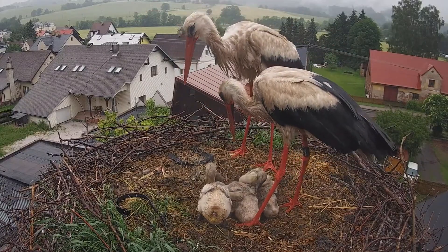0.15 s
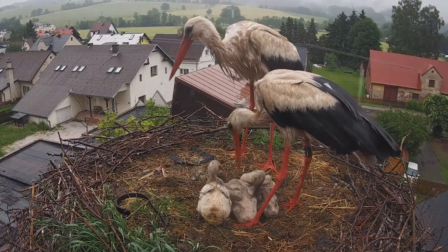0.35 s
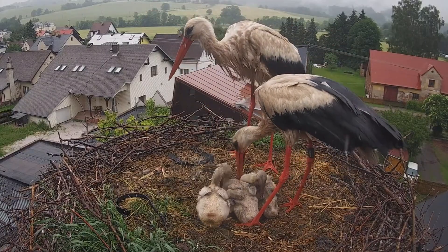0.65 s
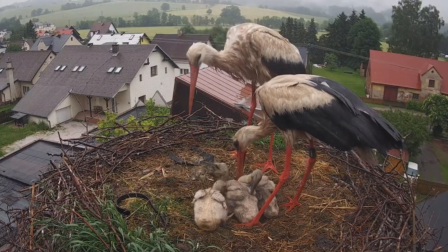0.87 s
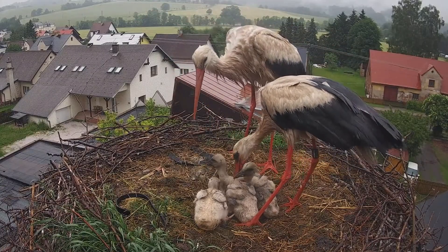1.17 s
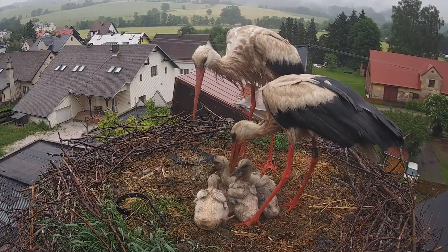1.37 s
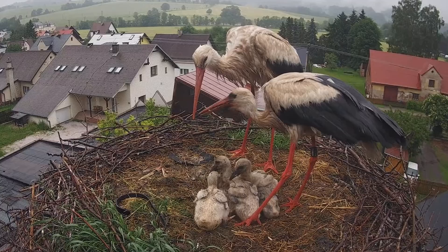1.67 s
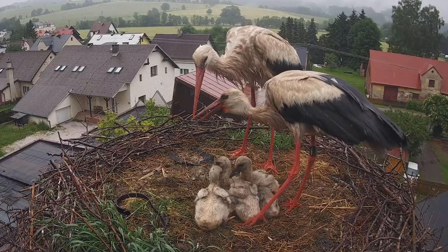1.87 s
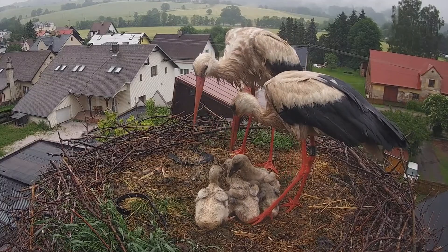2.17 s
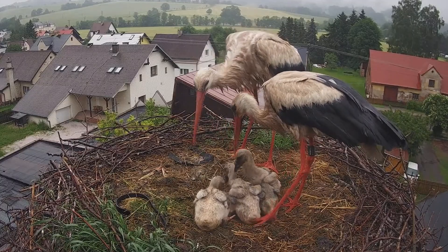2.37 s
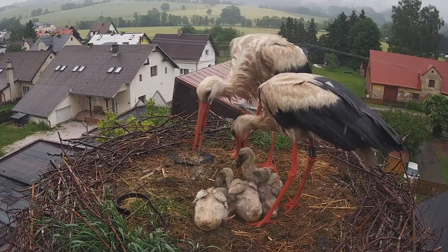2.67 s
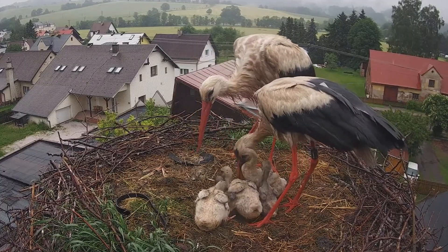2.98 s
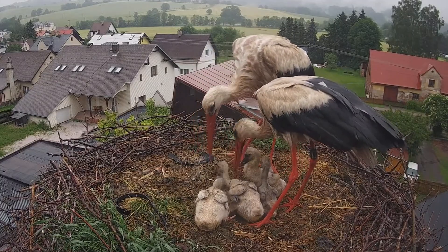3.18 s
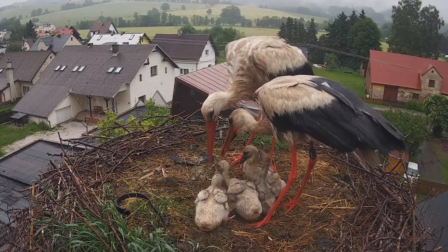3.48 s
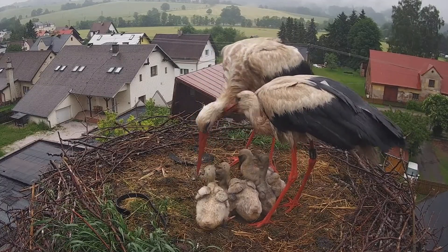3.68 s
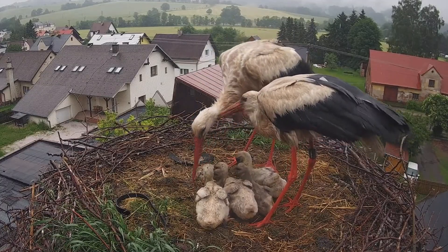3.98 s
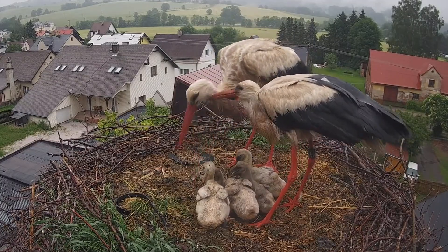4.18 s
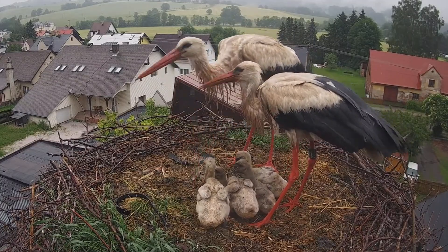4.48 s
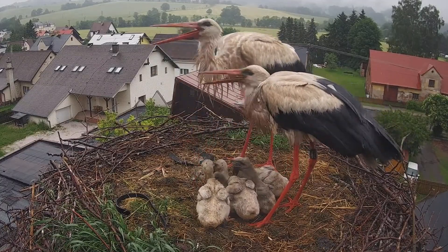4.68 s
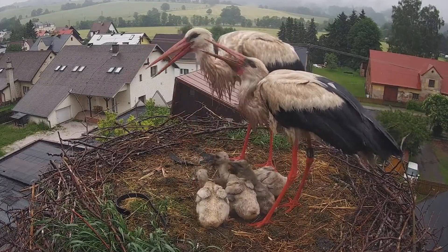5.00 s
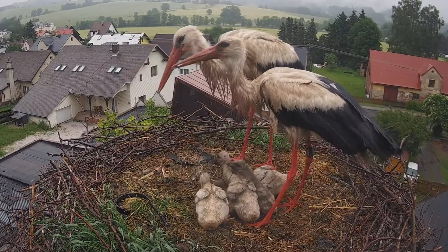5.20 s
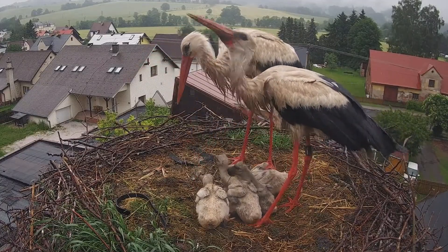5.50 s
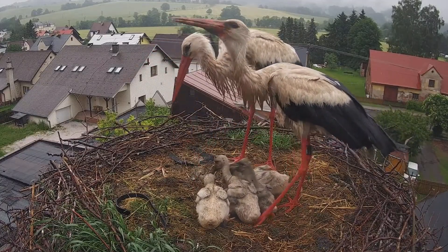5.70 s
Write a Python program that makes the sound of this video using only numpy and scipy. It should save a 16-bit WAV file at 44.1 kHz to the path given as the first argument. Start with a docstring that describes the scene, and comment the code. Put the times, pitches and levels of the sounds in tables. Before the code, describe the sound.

Outdoor nest in the rain, mono and close, with only a short faint scatter around the calls. Rain starts as a soft wash with fine patter and rises over the first three seconds to a fuller steady hiss. From 0 to 1.5 s chicks whine quietly, thin and hoarse, with small yelps and hisses; a crisp drop ticks beside the microphone near 0.6 s. Around 1.7 to 2.1 s a small bird twitters in high hooked chips and warbling trills among arched peeps. Light dry bill snaps come at about 2 and 2.5 to 2.8 s, and a dull step thuds in the nest near 2.9 s. From then to 4.9 s begging is dense: overlapping peeps, falling yelps, rough whines, raspy gliding hisses, one more snap at 4.5 s. A thinner moment follows, then last peeps and hisses from 5.2 s, a faint drop tick near 5.6 s and continuing rain.

```python
"""Rain that grows heavier over a stork nest above a village, heard by a mono nest camera.
A drop ticks beside the microphone while chicks whine hoarsely; bills snap lightly and yelps and hisses join.
A dull step thuds through the nest and a small bird twitters in hooked chips and warbling trills.
Then the begging thickens: arched peeps, downward yelps, rough whines and fluttering, gliding hisses.
After a thinner moment come a few last peeps and hisses, and one more near drop in the rain."""
import sys
import numpy as np
from scipy import signal
from scipy.fft import rfft, irfft, next_fast_len
from scipy.io import wavfile
from scipy.ndimage import map_coordinates

SR = 44100
rng = np.random.default_rng(int(sys.argv[2]) if len(sys.argv) > 2 else 0)


def pcm_store(signal):
    """Save signal as 16-bit PCM."""
    levels = np.round(np.clip(np.atleast_2d(signal), -1, 1) * 32767)
    wavfile.write(sys.argv[1], SR, levels.astype(np.int16).T)


N = 257968
TIME = np.arange(N) / SR


def undb(db):
    """Turn decibels into an amplitude factor."""
    return 10 ** (np.asarray(db) / 20)


def unit(x):
    """Scale to rms 1."""
    return x / np.sqrt(np.mean(np.abs(x) ** 2) + 1e-18)


def add(out, start, x):
    """Mix x into out from a start time on."""
    i = max(int(start * SR), 0)
    out[i:i + len(x)] += x[:max(N - i, 0)]


def colour(x, points):
    """Filter by an outline of (Hz, relative dB); white noise keeps its level."""
    hz, db = np.transpose(points)
    f = np.maximum(np.fft.rfftfreq(len(x), 1 / SR), 1)
    gain = unit(undb(np.interp(np.log(f), np.log(hz), db)))
    return irfft(rfft(x) * gain, len(x))


def walk(n, rate):
    """Random levels, rate of them a second, joined smoothly; spread near 1."""
    at = np.arange(n) * rate / SR
    levels = rng.standard_normal(int(at[-1]) + 2)
    return map_coordinates(levels, [at], order=2, mode="nearest")


def turbulence(n, width_hz, repeat=0., flap_hz=115):
    """Wandering amplitude and phase of an air-driven resonance; a share repeats with each throat flap."""
    size = next_fast_len(n + 512)
    f = np.fft.fftfreq(size, 1 / SR)
    drive = rng.standard_normal(size) + 1j * rng.standard_normal(size)
    drive = drive / (1 - repeat * np.exp(-2j * np.pi * f / flap_hz))
    resonance = 1 / (1 + np.abs(2 * f / width_hz) ** 3)
    return unit(np.fft.ifft(drive * resonance)[:n])


def slope(middle, change):
    """Early, middle and late value of an even glide."""
    return middle + change * np.array([-.5, 0, .5])


def arch(start, end, pitches):
    """Phase of a tone that bends smoothly through three pitches."""
    u = np.linspace(0, 1, max(int((end - start) * SR), 64))
    hz = np.polyval(np.polyfit([0, .5, 1], pitches, 2), u)
    return 2 * np.pi * np.cumsum(hz) / SR


def swell(n, levels_db, edge_s):
    """Loudness through the equal parts of a call, with soft ends."""
    i = np.arange(n)
    centres = (np.arange(len(levels_db)) + .5) / len(levels_db)
    db = np.interp(i / n, centres, levels_db)
    edge = np.minimum(np.minimum(i, i[::-1]) / (edge_s * SR), 1)
    return undb(db) * np.sin(np.pi / 2 * edge)


def rain(drop_rate=1100, scatter_db=3.5, patter_db=-4, wash_db=-1.27, drift_db=.5):
    """A wash of countless far drops, and nearer ones of very uneven size pattering on the twigs."""
    # rain loudness before its random drift: time_s, level_db
    loudness = [(0, -45.5), (.5, -44.5), (.8, -42.5), (1.2, -41.5), (1.6, -40.5), (2.15, -39), (2.7, -38),
                (3.6, -38), (4.4, -37.5), (5.1, -37), (5.85, -37)]
    # outline of all the rain: frequency_hz, relative_db
    rain_outline = [(20, -8), (50, -5.5), (78, -1.5), (135, -9), (250, -4.5), (410, 3.5), (480, -3),
                    (750, 2), (1750, 0), (2700, -2), (4600, -2.5), (6300, -8), (10600, -18.5), (15500, -31)]
    # extra outline of the near drops, brighter than the wash: frequency_hz, relative_db
    patter_outline = [(300, -7.5), (900, -1), (2500, 0.5), (6000, 0.5), (15000, 3.5)]
    hit = rng.random(N) < drop_rate / SR  # drops per second
    sizes = undb(scatter_db * np.minimum(rng.exponential(size=N), 5)) * rng.choice([-1, 1], N)
    patter = undb(patter_db) * unit(colour(hit * sizes, patter_outline))
    wash = undb(wash_db) * rng.standard_normal(N)
    level_db = np.interp(TIME, *np.transpose(loudness)) + drift_db * walk(N, 12)
    return colour(patter + wash, rain_outline) * undb(level_db)


def surroundings(x, wet_db=-15, t60_s=0.543):
    """Twigs and roofs scatter a short, faint tail, here decaying noise after a 3 ms gap."""
    t = TIME[:SR // 2]
    tail = rng.standard_normal(len(t)) * np.exp(-np.log(1000) * t / t60_s) * (t > .003)
    return x + undb(wet_db) * signal.fftconvolve(x, tail / np.linalg.norm(tail))[:N]


def nest_steps():
    """Steps and shifts in the nest: dull noise that swells and fades as weight moves."""
    # steps: start_s, length_s, level_db before the swell
    moves = [(1.478, 0.234, -54), (2.767, 0.073, -54), (2.851, 0.121, -42.5), (3.514, 0.081, -53)]
    # outline of the thud: frequency_hz, relative_db
    thud_outline = [(20, 2), (45, -6), (90, -13.5), (150, -19.5), (300, -4), (600, -25.5), (1000, -60)]
    out = np.zeros(N)
    thud = colour(rng.standard_normal(N), thud_outline)
    for start, length, db in moves:
        part = thud[int(start * SR):int((start + length) * SR)]
        add(out, start, undb(db) * unit(part) * np.hanning(len(part)))
    return out


def near_drops(decay_s=0.00017, drop_hz=3200):
    """Drops beside the microphone: each tick is a tone that dies within about one cycle."""
    # near drops: start_s, peak_db
    drops = [(0.07, -40), (0.5695, -21), (2.745, -36), (5.633, -34)]
    out, t = np.zeros(N), TIME[:1024]
    for start, db in drops:
        add(out, start, undb(db) * np.cos(2 * np.pi * drop_hz * t) * np.exp(-t / decay_s))
    return out


def bill_snaps(attack_s=0.000267, decay_s=0.00251):
    """Dry bill snaps: coloured noise with a sudden start and a quick exponential decay."""
    # snaps: start_s, relative_level_db
    snaps = [(0.2, -48), (0.581, -48), (0.591, -54), (0.608, -46), (1.953, -40), (1.974, -40),
             (2.4696, -34), (2.655, -38.5), (2.6785, -33.5), (2.812, -34), (4.501, -32.5)]
    # outline of the bill's ring: frequency_hz, relative_db
    bill_outline = [(500, -11.5), (1000, -9.5), (3500, -24.5), (5300, 9), (6500, -7), (8000, -12),
                    (15000, -27)]
    out, t = np.zeros(N), TIME[:1024]
    envelope = np.minimum(t / attack_s, 1) * np.exp(-t / decay_s) * 4.2
    for start, db in snaps:
        burst = unit(colour(rng.standard_normal(len(t)), bill_outline))
        add(out, start, undb(db) * burst * envelope)
    return out


def twitter(trill_hz=6700, depth_hz=280, warble_hz=85, chip_s=0.01677, second_voice_db=-5):
    """A small bird: two-voiced chips that hook upward, and thin warbling trills."""
    # hooked chips: start_s, opening_level_db
    chips = [(1.735, -38.5), (1.844, -36.5), (1.89, -35), (2.015, -35), (2.064, -36.5)]
    # trills between the chips: start_s, end_s, level_db
    trills = [(1.656, 1.694, -43.5), (1.697, 1.72, -41.5), (1.804, 1.828, -42), (1.859, 1.882, -46),
              (1.976, 2.005, -49), (2.021, 2.052, -44)]
    out = np.zeros(N)
    for start, db in chips:
        chip = np.sin(arch(start, start + chip_s, [4400, 6400, 6100]))
        chip = chip + undb(second_voice_db) * np.sin(arch(start, start + chip_s, [5200, 7100, 6300]))
        add(out, start, unit(chip) * swell(len(chip), [db, db + 3.5, db - 15], 0.0021))
    for start, end, db in trills:
        t = TIME[:int((end - start) * SR)]
        hz = trill_hz + depth_hz * (np.sin(2 * np.pi * warble_hz * t) + .5 * walk(len(t), 355))
        trill = np.sin(2 * np.pi * np.cumsum(hz) / SR)
        add(out, start, unit(trill) * swell(len(t), [db], 0.0046))
    return out


def pushes(attack_s=0.013, release_s=0.0257, sag_db=2.5):
    """Strength of throat hiss and bill sizzle: each push of air rises, sags and dies away exponentially."""
    # begging hisses: start_s, length_s, throat_db, sizzle_db (relative levels, reached as the hold ends)
    breaths = [(0.323, 0.064, -49, -42), (0.641, 0.0282, -44, -46), (0.892, 0.1245, -44.5, -39.5),
               (1.439, 0.037, -50, -44.5), (1.793, 0.0353, -42.5, -44.5), (1.936, 0.0563, -40, -49.5),
               (2.27, 0.0756, -43.5, -37.5), (2.547, 0.038, -45.5, -49.5), (2.802, 0.0315, -44, -32.5),
               (2.824, 0.0558, -37.5, -39), (2.919, 0.0605, -47, -33.5), (3.002, 0.1336, -45, -37),
               (3.237, 0.131, -42, -36.5), (3.367, 0.0814, -39.5, -41), (3.751, 0.116, -39, -42),
               (3.89, 0.114, -46, -46.5), (4.008, 0.094, -58, -34.5), (4.105, 0.0504, -37.5, -39),
               (4.25, 0.0653, -37, -40), (4.312, 0.129, -40.5, -32.5), (4.441, 0.1505, -43, -34.5),
               (4.607, 0.156, -46.5, -39), (4.816, 0.0766, -40, -35.5), (5.309, 0.039, -45.5, -47.5),
               (5.476, 0.096, -49, -41), (5.547, 0.043, -37, -39.5)]
    power = np.zeros((2, N))
    for start, length, *levels in breaths:
        t = TIME[:int((length + 10 * release_s) * SR)]
        rise = np.minimum(t / attack_s, 1)
        sag = undb(sag_db * (1.0 - t / length))
        release = np.exp(-np.maximum(t - length, 0) / release_s)
        for layer, db in zip(power, levels):
            add(layer, start, (undb(db) * rise * sag * release) ** 2)
    return np.sqrt(power)


def rasps(base_width_hz=486, widening=0.141, fade_db=3.5, flutter_db=2):
    """Hoarse calls: turbulent air rings one gliding throat resonance and fades as the air runs out."""
    # rasps: start_s, length_s, centre_hz, glide_hz, middle_level_db
    hoarse_calls = [(0.325, 0.057, 3350, -600, -41.5), (0.895, 0.1033, 5794, -200, -38.5),
                    (1.798, 0.0383, 2950, -300, -34), (1.944, 0.0406, 6400, -500, -37),
                    (2.276, 0.0688, 3850, -400, -32.5), (2.554, 0.05, 3172, 303, -36),
                    (2.804, 0.054, 5136, -500, -30), (2.848, 0.0884, 3080, -500, -39.5),
                    (2.885, 0.072, 5250, 204.5, -35), (3.059, 0.0612, 3857, 0.5, -32),
                    (3.303, .17, 2469, -350, -34.5), (3.255, 0.0483, 5640, -600, -37.5),
                    (3.274, 0.1492, 3881, -400, -31.5), (3.308, 0.178, 1660, -350, -35),
                    (3.76, 0.1105, 1606, -4, -36), (3.764, 0.1733, 2290, -200, -35.5),
                    (4.014, 0.036, 4273, 1597, -33.5), (4.04, 0.0648, 5173, -600, -30.5),
                    (4.054, 0.064, 7530, 1199.5, -37.5), (4.117, 0.074, 1920, -1500, -33.5),
                    (4.252, 0.0978, 2180, -630, -31), (4.34, 0.0705, 3020, 1003.5, -30.5),
                    (4.34, 0.12, 1888, -1.5, -38), (4.349, 0.219, 4770, -900, -36),
                    (4.441, 0.2122, 1696, -330, -30.5), (4.521, 0.162, 4209, -100, -39),
                    (4.821, 0.1175, 1583, -550, -31), (4.833, 0.0728, 2951, 400, -32.5)]
    out = np.zeros(N)
    for start, length, hz, glide, db in hoarse_calls:
        phase = arch(start, start + length, slope(hz, glide))
        n = len(phase)
        width_hz = base_width_hz + widening * hz
        grain = turbulence(n, width_hz, repeat=.3, flap_hz=rng.uniform(105, 170))
        ring = np.real(grain * np.exp(1j * phase)) * undb(flutter_db * walk(n, 203.4))
        add(out, start, unit(ring) * swell(n, slope(db, -fade_db), 0.009))
    return out


def hisses(throat_db=1, flutter_db=4, flutter_hz=280, crackle_db=3):
    """Air rushes through throat and bill; wet membranes make the throat flutter and the air crackle."""
    # outline of the hiss in the throat: frequency_hz, relative_db
    throat_outline = [(250, -54.5), (500, -2), (780, 4), (1080, 1), (1550, -0.5), (2500, 0.5), (4000, -6),
                      (6000, -26), (10000, -20)]
    # outline of the sizzle at the bill: frequency_hz, relative_db
    sizzle_outline = [(1200, -21), (2800, 4.5), (4200, -1.5), (5500, 4), (7000, -3), (8700, -10),
                      (9500, -22), (11600, -17), (13000, -51.5), (15500, -51)]
    throat_push, sizzle_push = pushes()
    jet = unit(rng.standard_normal(N) * undb(crackle_db * walk(N, 2500)))
    flutter = unit(undb(flutter_db * np.minimum(walk(N, flutter_hz), 1)))
    throat = colour(jet, throat_outline) * undb(throat_db) * throat_push * flutter
    sizzle = colour(jet[::-1], sizzle_outline) * sizzle_push  # reversed, so the two do not coincide
    return throat + sizzle


def calls(octave_db=-24.5):
    """Every whistle by its kind: start s, end s, three pitches, three levels, roughness, octave dB."""
    # peeps: start_s, length_s, middle_hz, arch_height_hz, level_db, middle_thinning_db, octave_db
    peeps = [(0.841, 0.0975, 3632, 380.3, -40.5, -7.5, -20.5), (0.91, 0.0796, 3640, 498, -31.5, -3, -25.5),
             (1.744, 0.0579, 4009, 654, -32.5, -4.5, -38.5), (1.912, 0.0363, 4654, 303, -33.5, -8, -12.5),
             (2.218, 0.0688, 4480, 1293, -33, 6, -25.5), (2.484, 0.0797, 4404, 1499, -34.5, 10, -28.5),
             (2.767, 0.0398, 4313, 653, -29.5, -1, -2), (2.95, .052, 3489, 505.7, -32.5, -5, -13),
             (3.027, 0.062, 3165, 252, -31, 0.5, -7.5), (3.081, .072, 3287, 361, -28, -1.5, -13),
             (3.201, .052, 4476, 1417, -27.5, 1.5, -26), (3.698, .062, 4760, 1346, -27.5, 16.5, -22),
             (4.21, 0.055, 3966, 703, -33, 4.5, -29), (5.246, 0.056, 3122, 601.6, -34.5, 4.5, -12),
             (5.314, 0.058, 3286, 457, -35, -2, -10.5), (5.384, 0.08, 3172, 299.4, -37.5, 1.5, -14),
             (5.512, 0.0497, 4203, 703, -29, -6, -34.5)]
    # yelps, quick downward slurs: start_s, length_s, first_hz, middle_level_db
    yelps = [(0.369, 0.0149, 4870, -34), (.633, .016, 3085, -27), (0.646, 0.0116, 2562, -31),
             (.886, 0.035, 4724, -35.5), (2.262, 0.0267, 4800, -29), (2.945, .018, 3440, -26.5),
             (2.954, 0.02, 2540, -34), (3.047, 0.0272, 4430, -28), (3.222, .022, 4350, -25),
             (3.289, 0.026, 4900, -31), (3.753, .014, 4292, -22.5), (4.085, 0.033, 7800, -30.5),
             (4.087, 0.0363, 3664, -26), (4.242, .014, 3846, -25), (4.717, 0.037, 3606, -33),
             (5.498, 0.0209, 2923, -32.5)]
    # whines, held notes from thin to hoarse: start_s, length_s, middle_hz, glide_hz, level_db, roughness (0-1)
    whines = [(0, 0.129, 2886, -450, -43.5, 0.47), (.115, 0.111, 1847, 192.5, -46.5, 0.1),
              (.22, 0.1296, 1997, 51, -40, 0.2), (.11, 0.129, 2590, -80, -49, 0.5),
              (0.241, 0.131, 2537, -0.5, -45, 0.45), (0.804, 0.07, 4900, -300, -43.5, 0.77),
              (0.875, 0.095, 2337, -250, -43, 0.42), (0.967, 0.1016, 2072, -58.5, -36.5, 0.42),
              (1.077, 0.129, 1788, -180, -44, 0.16), (1.268, 0.042, 2779, 250, -47, .2),
              (1.275, 0.1175, 2050, -100, -38, .3), (.985, .075, 2950, -450, -46.5, .5),
              (1.392, 0.069, 2750, 351.5, -39, 0.58), (1.436, 0.0887, 2360, -380, -38, .3),
              (2.949, 0.087, 1750, -47, -42.5, 0.25), (2.986, 0.0279, 3754, 301.5, -31, 0.65),
              (3.149, 0.0568, 2756, -200, -31.5, 0.54), (3.24, .15, 2645, -150, -29.5, 0.71),
              (3.758, 0.1308, 3710, -130, -26.5, 0.71), (3.888, 0.1115, 3480, -450, -34, 0.84),
              (3.995, 0.021, 2885, -100, -27.5, 0.59), (3.939, .022, 2289, 600, -34.5, 0.77),
              (4.305, 0.0377, 4676, 350.5, -30, 0.13), (4.351, 0.0505, 3011, 599.5, -30.5, 0.67),
              (4.438, 0.0776, 4916, 0.5, -36, 0.63), (4.524, 0.1285, 3895, -500, -32.5, 0.53),
              (4.574, .1, 3276, -250, -41.5, 0.26), (4.654, 0.0608, 3930, -150, -32.5, 0.72),
              (4.75, 0.0716, 2012, 152, -30.5, 0.67), (4.923, 0.0657, 1990, -2.5, -39, 0.69),
              (5.191, 0.018, 3640, 0, -41, 0.3), (5.297, 0.0231, 2628, -0.5, -28.5, 0),
              (5.298, 0.0293, 4023, 0, -37.5, 0.23), (5.456, 0.019, 2730, 0, -32, 0.09),
              (5.494, 0.028, 4290, 898, -28, 0.42), (5.557, 0.1866, 1917, 6, -42.5, 0.72)]

    sag_hz, crescendo_db = 150, 1  # a peep ends lower and louder than it begins
    for start, length, top, height, db, thinning, peep_octave_db in peeps:
        pitches = [top - height + sag_hz / 2, top, top - height - sag_hz / 2]
        levels = [db - crescendo_db / 2, db - thinning, db + crescendo_db / 2]
        yield start, start + length, pitches, levels, 0.25, peep_octave_db

    fall, fade_db = 0.24, 1  # fall as a share of the first pitch
    for start, length, hz, db in yelps:
        pitches = slope(hz * (1 - fall / 2), -hz * fall)
        yield start, start + length, pitches, slope(db, -fade_db), 0.61, octave_db

    bow_hz, dip_db = 49.4, 1.5  # a whine's glide bows upward and its level dips midway
    ends = np.array([1, 0, 1])
    for start, length, hz, glide, db, rough in whines:
        pitches = slope(hz, glide) - bow_hz * ends
        yield start, start + length, pitches, db + dip_db * (ends - .5), rough, octave_db


def whistles(rough_hz=420, spread_hz=450, waver=0.0085, wander=0.00799, falter_db=1.05,
             tremble_db=3.5, flutter_db=4, buzz_hz=1080, buzz_db=-17, bill_top_hz=9480):
    """Nearly pure whistles with an octave; rough ones stutter and break up into a band of noise."""
    out = np.zeros(N)
    for start, end, pitches, levels, rough, octave_db in calls():
        phase, middle_hz = arch(start, end, pitches), pitches[1]
        n = len(phase)
        # fast and slow pitch unsteadiness, as shares of the middle pitch
        unsteady_hz = middle_hz * (waver * walk(n, 201.8) + wander * walk(n, 44.9))
        phase = phase + 2 * np.pi * np.cumsum(unsteady_hz) / SR
        voice = np.sqrt(1 - rough ** 2) + rough * turbulence(n, rough_hz + rough * spread_hz)
        stutter_db = (tremble_db + flutter_db * rough) * walk(n, 189.55) + falter_db * walk(n, 50.2)
        voice = voice * undb(stutter_db)
        # the membrane can only swing so far: the stutter has deep gaps but level tops
        voice = voice / np.sqrt(1 + np.abs(voice) ** 2 / 2)
        # the octave fades when it lies above the bill's top
        octave = undb(octave_db) / (1 + (2 * middle_hz / bill_top_hz) ** 10)
        tone = np.real(voice * (np.exp(1j * phase) + octave * np.exp(2j * phase)))
        # a second, slower membrane puts faint side tones around the whistle
        buzz = np.sin(2 * np.pi * np.cumsum(buzz_hz * (1 + 0.083 * walk(n, 91.57))) / SR)
        add(out, start, unit(tone * (1 + undb(buzz_db) * buzz)) * swell(n, levels, 0.00386))
    return out


def scene():
    """The nest's sounds with their scattered tail, under the rain, alike in both channels."""
    knocks = nest_steps() + near_drops() + bill_snaps()
    nest = surroundings(knocks + twitter() + rasps() + hisses() + whistles())
    return np.tile(nest + rain(), (2, 1))


def record(dry):
    """The camera's microphone dulls the highest treble, and the top is cut."""
    dull = signal.sosfilt(signal.butter(2, 14500, fs=SR, output="sos"), dry)
    return signal.sosfilt(signal.ellip(10, .2, 70, 15500, fs=SR, output="sos"), dull)


dry = scene()
out = record(dry)
pcm_store(out)
```